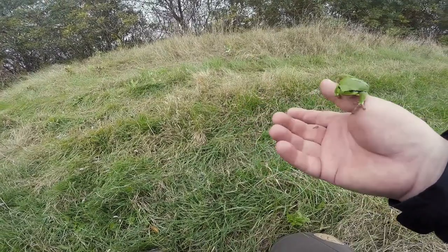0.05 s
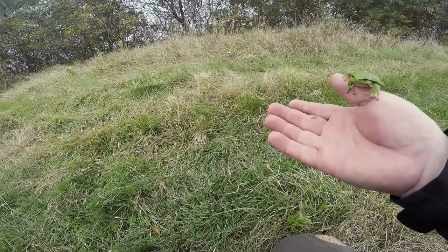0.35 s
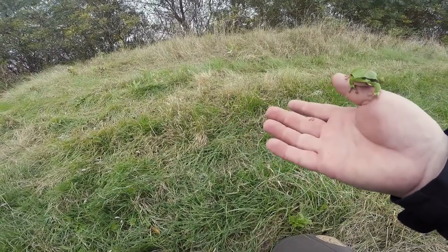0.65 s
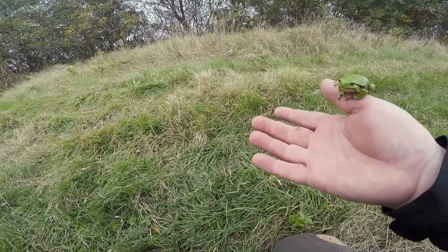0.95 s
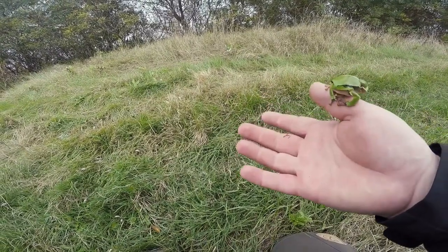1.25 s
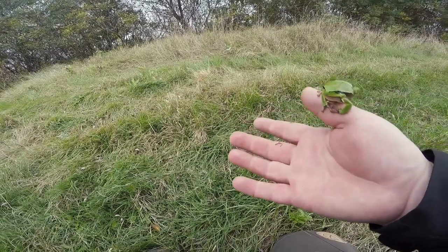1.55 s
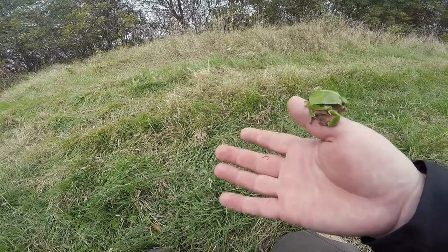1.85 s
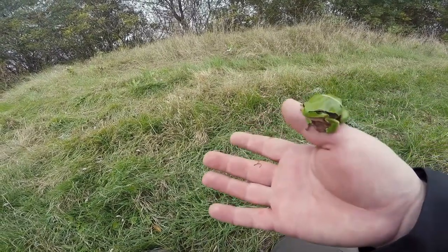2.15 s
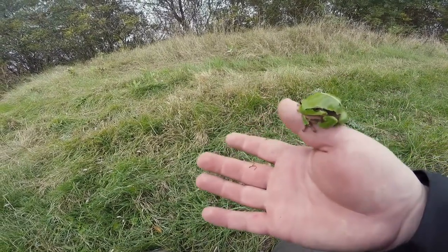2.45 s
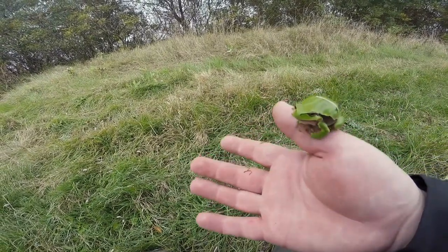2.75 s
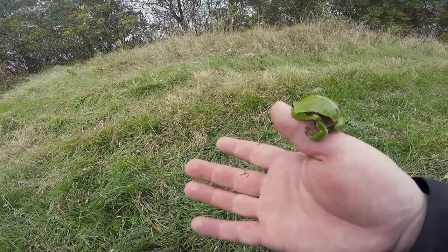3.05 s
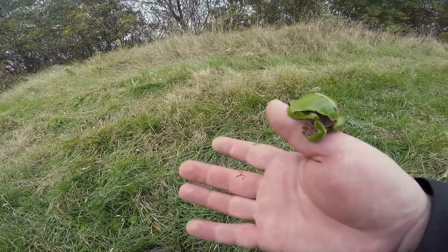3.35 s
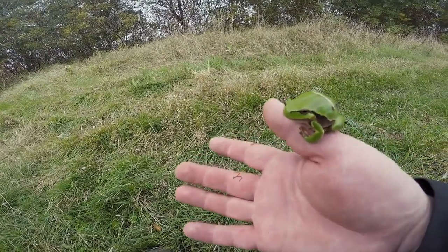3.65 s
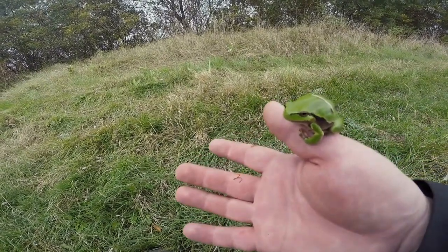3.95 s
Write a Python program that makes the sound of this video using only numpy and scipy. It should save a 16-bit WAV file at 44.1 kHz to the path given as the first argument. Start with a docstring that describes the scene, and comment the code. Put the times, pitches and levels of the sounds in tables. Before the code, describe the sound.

Quiet, deep outdoor rumble runs throughout on a grassy slope, with a distant machine hum, softly stirring air and microphone hiss. After a moment, scattered tiny ticks and soft knocks come from the camera being held.

```python
"""A low outdoor rumble, with the wavering drone of far machinery, beside a grassy bank.
Light air stirs over grass and trees, and a distant hollow rush comes and goes; these and the
rumble are shaped noise. The electronics of a hand-held camera add hiss and a faint whine.
As it is held, its body gives dry ticks (filtered impulses) and soft knocks (damped vibrations)."""
import sys
import numpy as np
from scipy import signal
from scipy.fft import rfft, irfft
from scipy.io import wavfile

SR = 44100
rng = np.random.default_rng(int(sys.argv[2]) if len(sys.argv) > 2 else 0)


def master(y):
    """Save y as 16-bit WAV."""
    cut = np.clip(np.atleast_2d(y).T, -1, 1)
    pcm = np.round(cut * 32767)  # scale
    wavfile.write(sys.argv[1], SR, pcm.astype(np.int16))


N = 176400

# stereo width, side against mid: frequency_hz, side_db
STEREO_WIDTH = [(30, -35), (70, -53), (130, -33), (500, -37), (2000, -37.5), (4000, -27.5), (9000, -24.5),
                (11500, -25.5), (13000, -32)]
# spectrum of the outdoor rumble: frequency_hz, relative_db
RUMBLE_SPECTRUM = [(5, -27), (20, -12.5), (35, -4), (52, 1), (66, -4), (80, -4), (92, -8), (109, -12.5),
                   (118, -15), (145, -19.5), (180, -29), (300, -36), (700, -61)]
# spectrum of air over grass and trees: frequency_hz, relative_db
AIR_SPECTRUM = [(60, -9), (200, 3), (300, 0), (450, -4.5), (720, -7), (860, -5), (1400, -11.5),
                (3000, -16.5), (8000, -26), (15000, -35)]
# slow rise and fall of the air: time_s, gain_db
AIR_ENVELOPE = [(0, 0), (.8, -1.5), (2, -1), (3.3, -1), (4, 1.5)]
# spectrum of the distant rush: frequency_hz, relative_db
RUSH_SPECTRUM = [(120, -20), (220, -10), (300, -3.5), (370, -8), (460, -18), (900, -28), (2000, -44)]
# swells of the rush: time_s, level_db
RUSH_ENVELOPE = [(0, -74), (.55, -69.5), (.85, -77), (1.1, -76), (1.55, -75.5), (1.9, -70), (2.2, -67.5),
                 (2.55, -78), (2.95, -77.5), (3.25, -67), (3.6, -78), (3.8, -65), (4, -73.5)]
# tones of far machinery: pitch_hz, level_db, waver_ratio
DRONE_TONES = [(44.28, -54.5, 0.39), (53.26, -70, 0.8), (98.53, -59, .2), (106.5, -60, 0.16)]
# spectrum of the electronic hiss: frequency_hz, relative_db
HISS_SPECTRUM = [(100, -5.5), (1500, 2), (3000, 0.5), (4200, 0.5), (6000, -2.5), (8000, -5.5), (11000, -8),
                 (15000, -11)]
# dry ticks of the camera body: start_s, level_db, centre_hz, spread_octaves
BODY_TICKS = [(1.0770, -57, 9000, .7), (2.4090, -45, 5000, .8), (2.6937, -57, 6000, 1),
              (2.7956, -42, 6500, 0.87), (2.8027, -51, 8000, .8), (2.8538, -49, 13700, .22),
              (3.1161, -50, 7500, 0.56), (3.7424, -49, 7000, 0.54)]
# soft knocks on the camera body: start_s, level_db, pitch_hz
BODY_KNOCKS = [(1.0922, -56, 1190), (1.6436, -49, 920), (2.6937, -54.5, 1100), (2.7973, -57, 1800),
               (3.128, -46.5, 680), (3.361, -50, 710), (3.6794, -56, 1200)]


def amp(db):
    """Amplitude ratio: tenfold for every 20 dB."""
    return 10 ** (np.asarray(db) / 20)


def unit(x):
    """Normalisation to an rms of 1."""
    return x / np.sqrt(np.mean(abs(x) ** 2) + 1e-30)


def spectrum(points, hz):
    """Spectral gain at hz, interpolated in decibels over log frequency."""
    corner_hz, db = np.transpose(points)
    return amp(np.interp(np.log(hz + 1), np.log(corner_hz + 1), db))


def envelope(points):
    """Amplitude envelope, interpolated in decibels over time."""
    return amp(np.interp(np.arange(N) / SR, *np.transpose(points)))


def add(mix, start_s, sound):
    """Superposition of a sound on the mix from start_s."""
    part = mix[round(start_s * SR):][:len(sound)]
    part += sound[:len(part)]


def drift(rate_hz):
    """Slow random fluctuation: low-passed Gaussian noise of rms 1."""
    hz = np.fft.rfftfreq(N, 1 / SR)
    return unit(irfft(rfft(rng.standard_normal(N)) * np.exp(-(hz / rate_hz) ** 2), N))


def noise(colour):
    """Random-phase noise of rms 1; a weak side signal leaves the two channels nearly alike."""
    hz = np.fft.rfftfreq(N, 1 / SR)
    mid, side = np.exp(2j * np.pi * rng.random((2, len(hz)))) * spectrum(colour, hz)
    side = side * spectrum(STEREO_WIDTH, hz)
    return unit(irfft(np.array([mid + side, mid - side]), N))


def rumble(level_db=-49.5):
    """Stationary noise with its energy concentrated in the deep bass."""
    return amp(level_db) * noise(RUMBLE_SPECTRUM)


def air(base_db=-67, flutter_db=1.1):
    """Broadband flow noise over grass and trees, gently modulated in amplitude."""
    stirring = amp(base_db + flutter_db * drift(rate_hz=6))
    return stirring * envelope(AIR_ENVELOPE) * noise(AIR_SPECTRUM)


def distant_rush():
    """Swelling noise, made hollow by a single broad spectral peak."""
    return envelope(RUSH_ENVELOPE) * noise(RUSH_SPECTRUM)


def machinery_drone(waver_hz=2.24):
    """Propagation through the air modulates low tones at random in amplitude and phase."""
    t = np.arange(N) / SR
    out = np.zeros(N)
    for pitch_hz, level_db, waver_ratio in DRONE_TONES:
        waver = 1 + waver_ratio * (drift(waver_hz) + 1j * drift(waver_hz))
        carrier = np.exp(2j * np.pi * (pitch_hz * t + rng.random()))
        out += amp(level_db) * unit((waver * carrier).real)
    return out


def electronics(hiss_db=-68, whine_hz=12618, whine_db=-92.5):
    """Self-noise of the circuits: a broadband hiss and one faint pure tone."""
    whine = unit(np.sin(2 * np.pi * whine_hz * np.arange(N) / SR))
    return amp(hiss_db) * noise(HISS_SPECTRUM) + amp(whine_db) * whine


def tick(level_db, centre_hz, spread_octaves, tail_s=.0012, tail_db=-23):
    """An impulse with a decaying noise tail, band-limited to a bright snap."""
    t = np.arange(1024) / SR
    hz = np.fft.rfftfreq(len(t), 1 / SR)
    band = np.exp(-.5 * (np.log2((hz + 1) / centre_hz) / spread_octaves) ** 2)
    tail = amp(tail_db) * np.exp(-t / tail_s) * rng.standard_normal(len(t))
    push = np.roll((t == 0) + tail, 16)  # the delay leaves room for the filter's pre-ringing
    snap = irfft(band * rfft(push))
    return amp(level_db) * snap / abs(snap).max()


def knock(level_db, pitch_hz, rise_s=.00015, decay_s=.00085, low_cut_hz=330):
    """Heavily damped vibration of a pushed casing, too small to radiate much bass."""
    t = np.arange(1024) / SR
    rise_and_decay = (1 - np.exp(-t / rise_s)) * np.exp(-t / decay_s)
    ring = -np.sin(2 * np.pi * pitch_hz * t) * rise_and_decay
    ring = signal.sosfilt(signal.butter(2, low_cut_hz, "highpass", fs=SR, output="sos"), ring)
    return amp(level_db) * ring / abs(ring).max()


def handling():
    """Handling excites brief transients in the camera body."""
    out = np.zeros(N)
    for start_s, level_db, centre_hz, spread_octaves in BODY_TICKS:
        add(out, start_s, tick(level_db, centre_hz, spread_octaves))
    for start_s, level_db, pitch_hz in BODY_KNOCKS:
        add(out, start_s, knock(level_db, pitch_hz))
    return out


def scene():
    """Linear superposition of all the sources."""
    return rumble() + air() + distant_rush() + machinery_drone() + electronics() + handling()


def record(dry, cutoff_hz=15310):
    """A steep linear-phase low-pass filter limits the camera's bandwidth."""
    low_pass = signal.firwin(1023, cutoff_hz, window=("kaiser", 9), fs=SR)
    return signal.oaconvolve(dry, low_pass[None], "same")


dry = scene()
out = record(dry)
master(out)
```